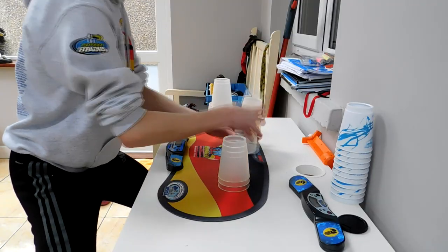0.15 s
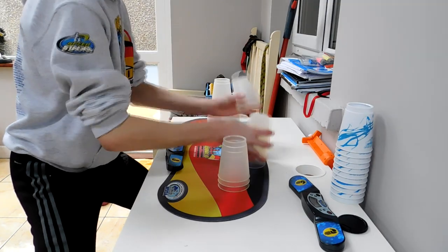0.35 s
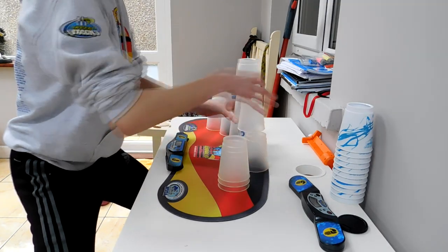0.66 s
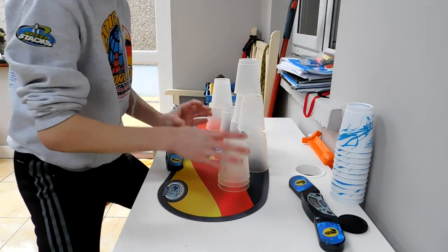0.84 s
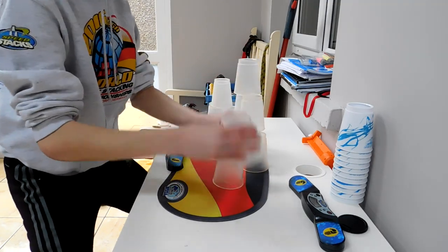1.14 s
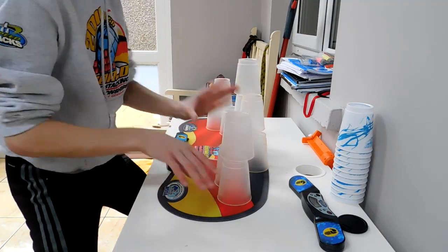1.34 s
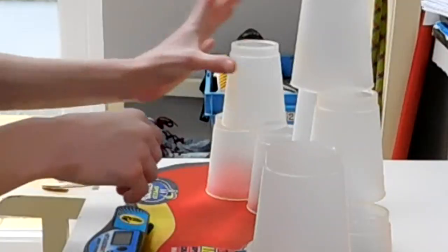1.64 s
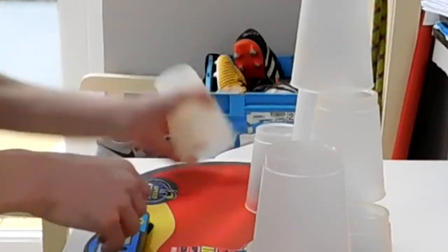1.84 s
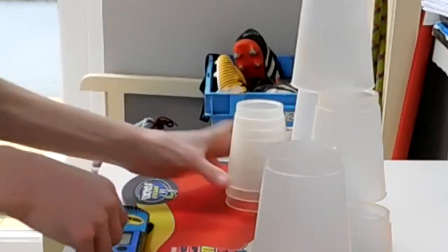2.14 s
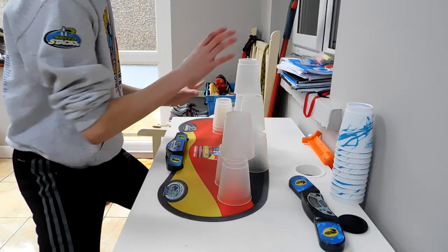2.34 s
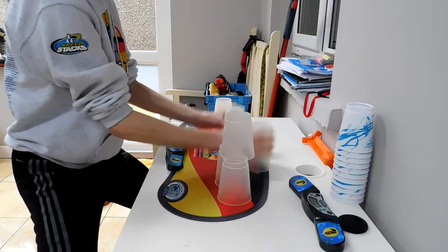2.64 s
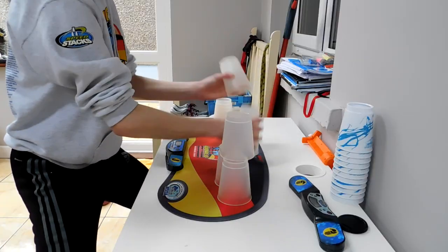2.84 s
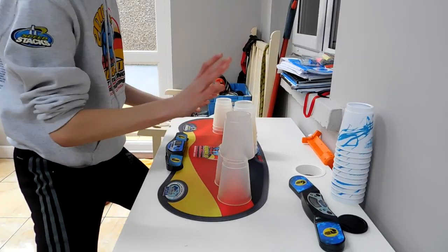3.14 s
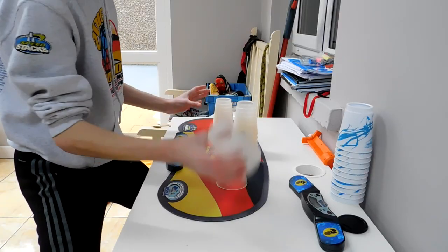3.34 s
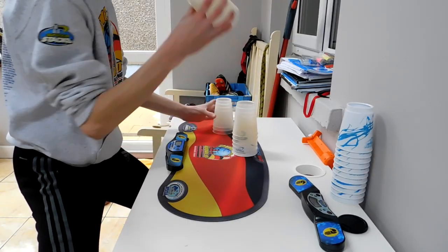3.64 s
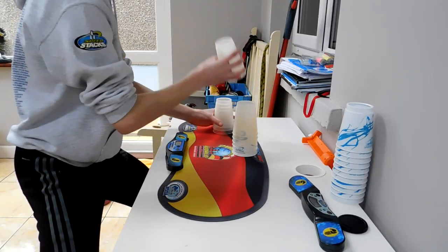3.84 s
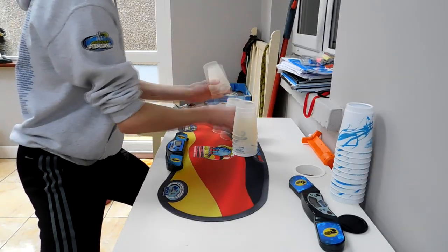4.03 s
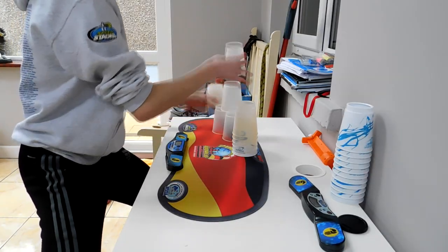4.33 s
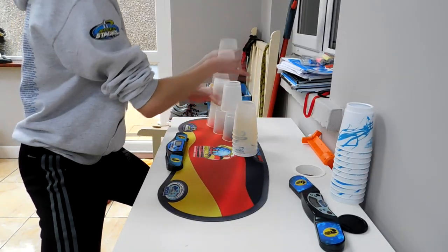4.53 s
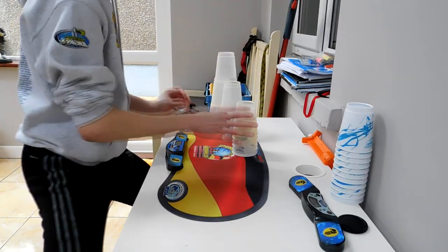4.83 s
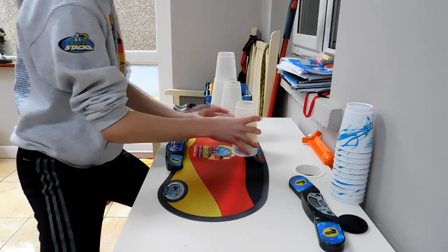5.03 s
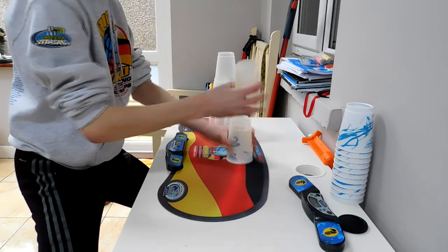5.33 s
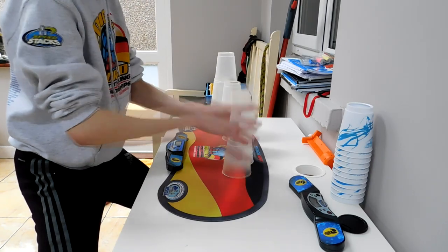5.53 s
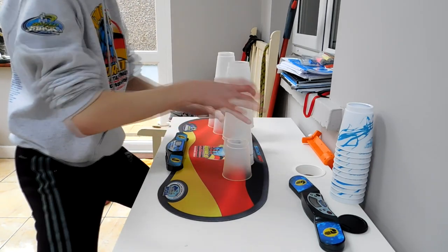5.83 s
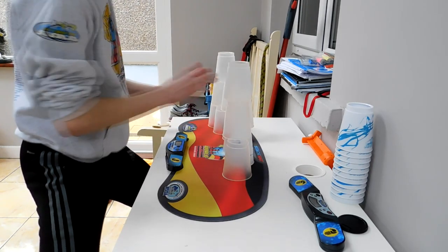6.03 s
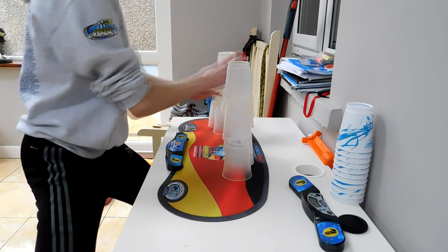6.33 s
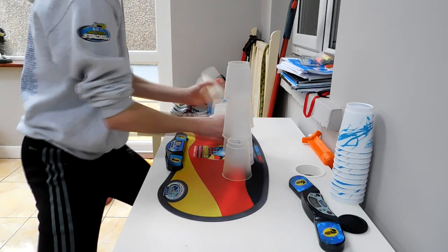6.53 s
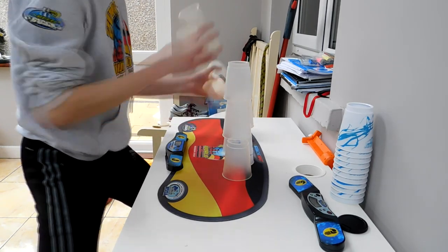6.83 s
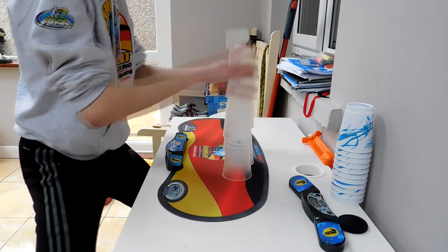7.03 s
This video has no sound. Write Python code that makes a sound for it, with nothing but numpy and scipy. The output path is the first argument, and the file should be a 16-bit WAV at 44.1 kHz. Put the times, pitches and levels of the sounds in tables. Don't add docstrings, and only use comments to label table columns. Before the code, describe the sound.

Rapid hollow knocks of plastic cups being stacked and pulled down, with nesting rattles and soft footsteps, in a reverberant tiled room.

```python
import sys
import numpy as np
from scipy import signal
from scipy.fft import rfft, irfft
from scipy.io import wavfile
from scipy.ndimage import uniform_filter1d

SR = 44100
rng = np.random.default_rng(int(sys.argv[2]) if len(sys.argv) > 2 else 0)


def unload_wav(signal):
    wavfile.write(
        sys.argv[1],
        SR,
        np.round(np.clip(np.atleast_2d(signal).T, -1, 1) * 32767).astype(np.int16),
    )


def volts(x):
    e = np.asarray(x, float) / 20
    return 10 ** e


N = 316197
LEAD = SR // 4

# frequency in Hz, level in dB per Hz.
HUSH_COLOUR = [(22, -76), (38, 5), (113, -5), (178, -9.5), (241, -6), (318, -17), (389, -6), (540, -10),
               (1210, -8), (2660, -18), (16000, -28)]

# air level in dB, air pitch in Hz,
# wall level in dB, wall pitch in Hz, crack level in dB, share of the undertone.
EARLIER_KNOCK = [(-37, 690, -37, 1250, -41, 0.17)]
# start in seconds, strength in dB,
# air pitch in Hz, wall pitch in Hz, crack in dB against the strength.
THUDS = [(0.412, -25, 668, 1634, -8.5), (0.498, -27, 787, 1065, -8.5), (1.055, -51, 295, 1320, -11),
         (1.254, -26.5, 590, 960, -35), (1.857, -26, 787, 930, -0.5), (2.077, -19, 550, 1190, -30),
         (2.112, -26, 740, 1770, -24), (2.62, -43.5, 640, 1330, -8), (2.648, -42, 450, 2020, 1),
         (2.707, -20.5, 757, 2034, -1.5), (2.952, -29, 745, 1250, -5.5), (3.274, -35.5, 490, 1030, -23),
         (4.093, -27, 437, 810, -17.5), (4.279, -29.5, 600, 930, -9.5), (4.456, -30, 480, 930, -11.5),
         (5.251, -60.5, 253, 1240, -15), (5.512, -17.5, 670, 814, -19.5), (5.633, -29.5, 710, 1050, -4),
         (5.791, -26.5, 714, 1390, -12.5), (6.374, -45.5, 625, 1180, -34)]
CLACKS = [(0.66, -27, 556, 1030, -10), (1.286, -25.5, 891, 1126, -7.5), (2.91, -20.5, 287, 1705, -6.5),
          (6.402, -38.5, 585, 1150, -16), (3.304, -36, 554, 1590, 3), (3.502, -32, 686, 1585, -3.5),
          (4.166, -30.5, 695, 995, -1), (4.603, -26, 590, 1230, -10.5), (4.615, -28, 755, 1290, -3),
          (6.424, -34, 452, 1290, -10), (7.037, -28, 636, 870, -10)]
TAPS = [
    (0.688, -26, 723, 1134, -6.5),
    (1.184, -65, 740, 1470, 13.5),
    (1.845, -26.5, 530, 1160, -17),
    (1.761, -47, 572, 1190, -23),
    (2.027, -19, 382, 1173, -2.5),
    (2.633, -33.5, 620, 1360, -18),
    (3.106, -44, 750, 1840, -20),
    (5.833, -21.5, 630, 1222, -9),
    (6.679, -29.5, 434, 850, -5.5),
    (7.165, -33.5, 885, 1400, -14),
]
TICKS = [(0.242, -55.5, 1195, 1840, -5.5), (0.564, -34.5, 743, 1880, -3), (1.092, -55, 390, 1430, -6),
         (1.819, -45, 720, 2580, 10), (2.984, -32.5, 318, 1470, -4), (3.03, -42.5, 990, 1690, -0.5),
         (3.291, -39, 700, 1440, 5), (3.317, -32, 995, 1450, 1), (3.579, -40.5, 390, 1890, -8.5),
         (3.943, -57, 410, 1660, -24), (5.289, -65.5, 590, 1760, -6), (5.402, -56.5, 206, 1750, -12),
         (5.701, -34, 903, 1700, -14), (6.591, -41, 690, 2130, -6), (6.799, -45, 856, 1820, -8.5),
         (6.495, -28, 753, 2170, 0.5), (7.113, -33.5, 795, 1930, 1.5)]
# air in dB, wall in dB, crack in dB, share of the undertone, how long the wall lasts (times normal).
THUD_MIX = ((-1.5, -8.5, 2, 0.55, 2.1), (11.5, 5.5, 4, 0.17, 1))
CLACK_MIX = ((0, 0, 1, 0.32, 1.18), (10, 16, 8.5, 0.2, 0.54))
TAP_MIX = ((-4.5, -3.5, 0, 0.25, 2.05), (11, 13, 10.5, 0.099, 0.98))
TICK_MIX = ((0, -6, 3.5, 0.43, 1.4), (10, 16.5, 13.5, 0.45, 1.5))
# from when in seconds, pitch in Hz, dB against the crack.
RIMS = [(0, 2980, 9), (0.4, 4100, -4), (0.62, 3600, -25), (1.0, 2900, -16), (2.0, 3500, -4),
        (2.69, 3260, -1), (3.28, 3600, -2.5), (3.7, 5230, -6), (4.25, 3880, -21), (4.58, 2380, -26),
        (5.6, 3960, -0.5), (5.75, 6240, -5), (6.4, 4020, -4), (6.65, 3420, -4), (7.0, 2200, 5)]
# time in seconds, level in dB.
NEARNESS = [(0.3, -1.5), (0.5, 3), (0.67, -8), (1.29, 3), (1.83, -0.5), (2.05, -7.5), (2.65, -1), (2.9, -1),
            (3.3, -0.5), (3.55, 1.5), (4.15, 1), (4.3, 1.5), (4.61, 2), (5.5, 0), (5.8, -0.5), (6.45, -9.5),
            (6.7, -3), (7.1, 0.5)]
# frequency in Hz, level in dB.
CRACK_COLOUR = [(2000, 1), (3100, -2), (4000, -0.5), (5500, -4), (8500, -7.5), (12000, -14), (16000, -23.5)]
# pitch in Hz, level in dB, time to fade by 60 dB in seconds.
TABLE_TOP = [(105, -23, 0.15), (140, -18.5, 0.088), (220, -35, 0.042), (284.4, -20, 0.073),
             (375.7, -11, 0.041)]

# frequency in Hz, time to fade by 60 dB in seconds.
ROOM_T60 = [(100, 0.36), (300, 0.45), (700, 0.49), (1080, 0.7), (1220, 0.74), (1400, 0.68), (2500, 0.8),
            (5000, 0.69), (9000, 0.52), (15000, 0.29)]
# frequency in Hz, level in dB.
ROOM_COLOUR = [(80, -8), (300, 7), (700, 4), (1000, 3.5), (1200, 1.5), (1450, 6.5), (2500, 3), (6000, 1),
               (15000, 3.5)]
# delay in seconds, level in dB.
EARLY_ECHOES = [(.0045, -22), (.0085, -15), (0.014, -9), (0.0259, -22), (.029, -26.5)]

# time in seconds, peak in dB, pitch in Hz.
STEPS = [
    (0.1, -46, 112),
    (0.783, -36.5, 114),
    (2.697, -21, 187.5),
    (2.981, -23, 112.7),
    (3.509, -26.5, 185.3),
    (5.078, -45.5, 114),
    (5.152, -49, 115),
    (5.259, -47, 114),
    (6.541, -35, 158),
    (6.721, -58, 119),
]
# time they seat in seconds, length of the approach in seconds,
# level in dB, pitch of the hollow in Hz, brightness in dB.
SLIDES = [(0.33, 0.014, -41, 355, -52), (1.096, .008, -45, 1410, -5), (1.257, .005, -24, 480, -55),
          (1.8, 0.033, -31, 630, -35), (1.855, 0.045, -22, 810, -46), (2.04, 0.011, -6.5, 555, -11.5),
          (2.082, 0.0073, -26, 653, -34), (2.675, 0.041, -31, 990, -3.5), (2.721, 0.048, -12, 756, -40),
          (3.324, 0.049, -21.5, 760, -39), (3.953, 0.0068, -46.5, 1190, -34), (4.026, 0.062, -62, 500, -22),
          (5.255, 0.0055, -58.5, 1120, 2), (5.403, .007, -59, 1750, -4), (6.435, 0.064, -39, 880, -37),
          (6.504, 0.054, -25.5, 1010, -6), (6.685, 0.0071, -41, 1770, -20)]

# middle in seconds, length in seconds.
DROPOUTS = [(1.641, .01), (2.378, .01)]


def evened(x):
    return x / np.sqrt(np.mean(x ** 2) + 1e-20)


def read(points, hz):
    f, value = np.transpose(points)
    return np.interp(np.log(hz + 1), np.log(f + 1), value)


def add(mix, s, sound):
    part = mix[LEAD + round(s * SR):][:len(sound)]
    part += sound[:len(part)]


def coloured(x, points):
    gain_db = read(points, np.fft.rfftfreq(x.shape[-1], 1 / SR))
    return irfft(rfft(x) * volts(gain_db), x.shape[-1])


def ring(t, hz, t60, rise):
    return (1 - np.exp(-t / rise)) * volts(-60 * t / t60) * np.sin(2 * np.pi * hz * t)


def hush():
    return volts(-61) * evened(coloured(rng.standard_normal(N), HUSH_COLOUR))


def click(points):
    gain = np.log(volts(read(points, abs(np.fft.fftfreq(8192, 1 / SR)))))
    pulse = np.fft.ifft(np.exp(np.conj(signal.hilbert(gain)))).real
    return pulse / abs(pulse).max()


def knock(crack, lasting, cavity_db, cavity_hz, wall_db, wall_hz, crack_db, under):
    t = np.arange(len(crack)) / SR
    free = (cavity_hz / 700) ** 0.5
    cavity = ring(t, cavity_hz, t60=0.019 * free, rise=0.0016)
    cavity += under * ring(t, 0.535 * cavity_hz, t60=0.02, rise=0.0033)
    cavity += 0.35 * ring(t, 1.672 * cavity_hz, t60=0.022, rise=0.0026)
    for hz, db, t60 in TABLE_TOP:
        cavity += volts(db) * ring(t, hz, t60, rise=0.02)
    wall = ring(t, wall_hz, t60=0.0097 * lasting, rise=0.00024)
    wall += 0.37 * ring(t, 1.466 * wall_hz, t60=0.013, rise=0.00092)
    return volts(cavity_db + 10.5) * cavity + volts(wall_db + 8.5) * wall + volts(crack_db + 5.5) * crack


def sent_knock(crack, row, mix):
    s, db, cavity_hz, wall_hz, crack_db = row
    cavity_gain, wall_gain, crack_gain, under, lasting = mix
    return knock(crack, lasting, db + cavity_gain, cavity_hz, db + wall_gain, wall_hz,
                 db + crack_db + crack_gain, under)


def knocks():
    direct, spread = np.zeros(LEAD + N), np.zeros((3, LEAD + N))
    size = 6144
    t = np.arange(size) / SR
    pulse = click([(60, -40)] + CRACK_COLOUR)[:size]
    kinds = [(THUDS, THUD_MIX), (CLACKS, CLACK_MIX), (TAPS, TAP_MIX), (TICKS, TICK_MIX)]
    events = sorted((row, mix) for kind, mix in kinds for row in kind)
    burst = ring(t, 57.5, t60=0.012, rise=.0003)
    chatter = rng.standard_normal((len(events), size)) * burst * volts(3)
    cracks = signal.fftconvolve(chatter, pulse[None], axes=1)[:, :size]
    add(spread[2], -.12, knock(volts(7) * pulse, 1.33, *EARLIER_KNOCK[0]))
    for k, (row, (sides, ahead)) in enumerate(events):
        s = row[0]
        peak_s = s + .0016
        rim_hz, rim_db = [rim[1:] for rim in RIMS if rim[0] <= s][-1]
        rim = volts(rim_db - 4) * ring(t, rim_hz, t60=.009, rise=.0004)
        near = volts(np.interp(s, *np.transpose(NEARNESS)))
        add(direct, peak_s, near * sent_knock(cracks[k] + volts(7) * rim, row, ahead))
        add(spread[k % 3], peak_s, sent_knock(volts(8) * pulse + rim, row, sides))
    return direct, volts(14.5) * spread


def room(x):
    hz, t, z = signal.stft(rng.standard_normal((3, SR)), SR, nperseg=512)
    shape_db = read(ROOM_COLOUR, hz)[:, None] - 60 * t / read(ROOM_T60, hz)[:, None]
    tail = signal.istft(z * volts(shape_db), SR, nperseg=512)[1][:, :SR]
    tail *= np.clip((np.arange(SR) / SR - .004) / 0.006, 0, 1)
    tail *= volts(2) / np.linalg.norm(tail, axis=1, keepdims=True)
    laps = np.arange(1, 60)
    lap_s, flutter_db, flutter_t60 = 0.0073, -20, 0.57
    for place in range(3):
        for s, db in EARLY_ECHOES:
            tail[place, int(s * rng.uniform(.95, 1.05) * SR)] += volts(db)
        at = laps * lap_s + rng.uniform(0, 0.0048) + rng.normal(0, 0.00018, len(laps))
        tail[place, (at * SR).astype(int)] += volts(flutter_db - 60 * at / flutter_t60)
    return signal.fftconvolve(x, tail, axes=1)[:, :LEAD + N].sum(0)


def steps():
    out, t = np.zeros(LEAD + N), np.arange(SR // 2) / SR
    for s, db, hz in STEPS:
        add(out, s - .008, volts(db - 2) * ring(t, hz, t60=0.32, rise=0.0011))
    return out


def resonate(x, hz, width):
    turn = np.exp(2j * np.pi * np.cumsum(hz) / SR)
    r = np.exp(-np.pi * width / SR)
    return 2 * (turn * signal.lfilter([1 - r], [1, -r], x / turn)).real


def slide(row):
    seat, approach, top_db, top_hz, round_db = row
    s = [seat - approach, seat, seat + 0.076]
    t = np.arange(s[0], s[-1], 1 / SR)
    level_db = top_db + np.interp(t, s, [-12.5, 0, -36])
    hz = top_hz * np.interp(t, s, [0.95, 1, 1])
    bright_db = round_db + np.interp(t, s, [23, 0, 23])
    chance = rng.random(SR // 4)[:len(t)]
    strength = rng.exponential(1, SR // 4)[:len(t)]
    noise = rng.standard_normal(SR // 4)[:len(t)]
    tick = (chance < 900 / SR) * volts(5.8 * strength) * np.sign(noise)
    ticks = evened(tick + 0.17 * noise)
    hollow = evened(resonate(ticks, hz, width=360) + .5 * resonate(ticks, 0.36 * hz, width=150))
    scrape = evened(coloured(ticks, [(9.2, -49)] + CRACK_COLOUR))
    sound = volts(level_db - 2.0) * (hollow + volts(bright_db) * scrape)
    return s[0], sound * signal.windows.tukey(len(t), .15)


def scene():
    direct, spread = knocks()
    moving = np.zeros_like(spread)
    for k, row in enumerate(SLIDES):
        add(moving[k % 3], *slide(row))
    moving[0] += steps()
    heard = (direct + moving.sum(0) + room(spread + moving))[LEAD:]
    no_bass = signal.butter(4, 100, "high", fs=SR, output="sos")
    return (signal.sosfilt(no_bass, heard) + hush())[None]


def low_pass(x):
    return signal.sosfilt(signal.butter(12, 16700, fs=SR, output="sos"), x)


def record(dry):
    power = uniform_filter1d(dry[0] ** 2, size=301, origin=150)
    power_db = 10 * np.log10(abs(power) + 1e-12)
    fall = np.arange(N) * 92.0 / SR
    over_db = np.maximum(np.maximum.accumulate(power_db + fall) - fall + 28.5, 0)
    held = dry[0] / volts(0.49 * uniform_filter1d(over_db, size=301, origin=150))
    for s, length in DROPOUTS:
        held = held * np.clip(abs(np.arange(N) / SR - s) / (length / 2), .5, 1) ** 2
    clipped = np.clip(held + .12 * held ** 2, -.41, .41)
    steady = signal.sosfilt(signal.butter(1, 15, "high", fs=SR, output="sos"), clipped)
    edge = signal.firwin(255, 16200, window=("kaiser", 8), fs=SR)
    mix = signal.oaconvolve(steady, edge, "same")[None]
    return low_pass(mix)


dry = scene()
out = record(dry)
unload_wav(out)
```